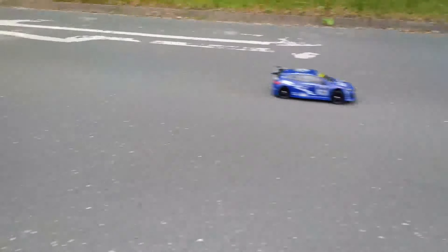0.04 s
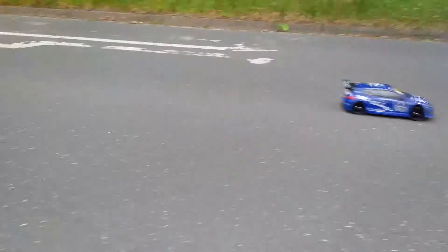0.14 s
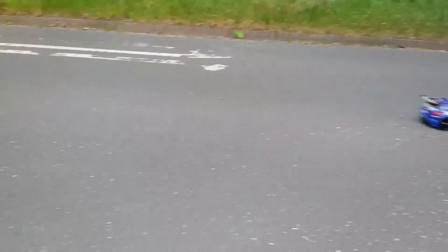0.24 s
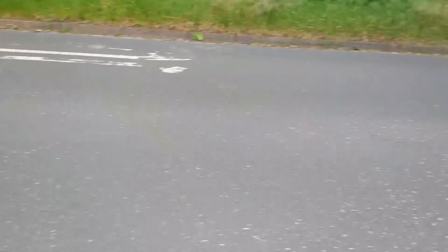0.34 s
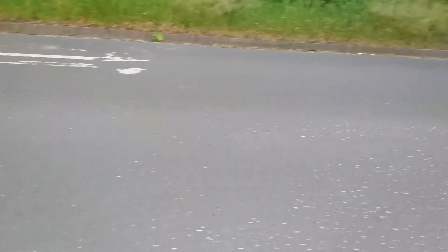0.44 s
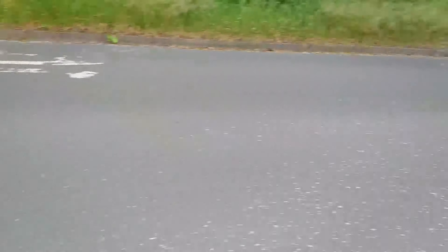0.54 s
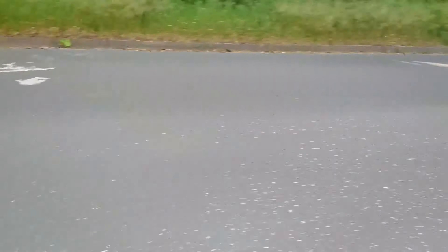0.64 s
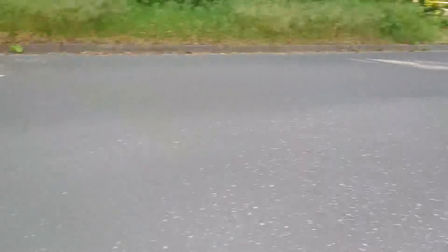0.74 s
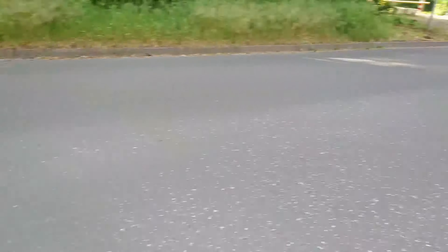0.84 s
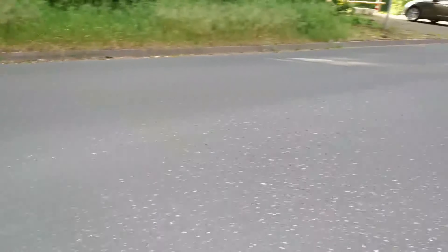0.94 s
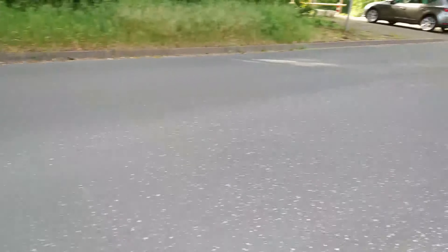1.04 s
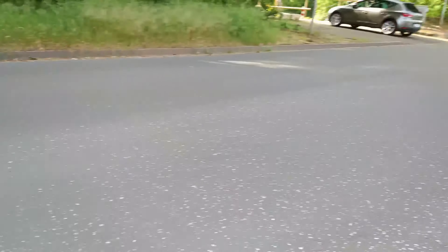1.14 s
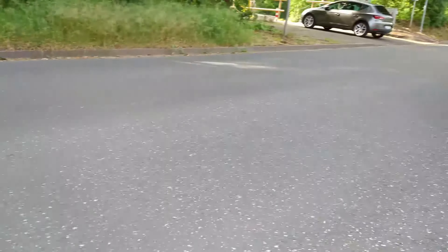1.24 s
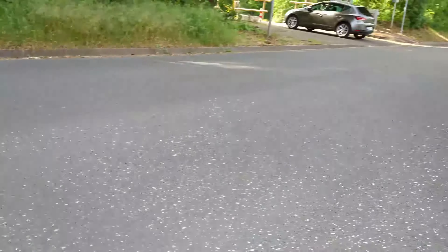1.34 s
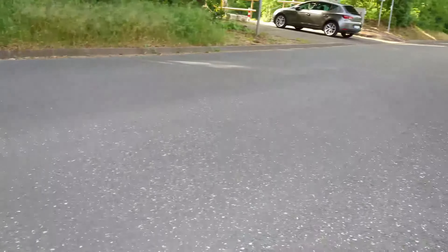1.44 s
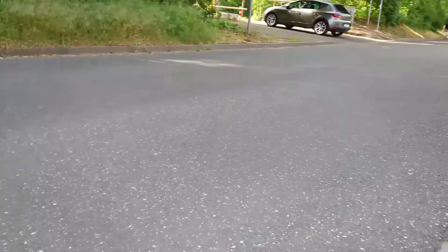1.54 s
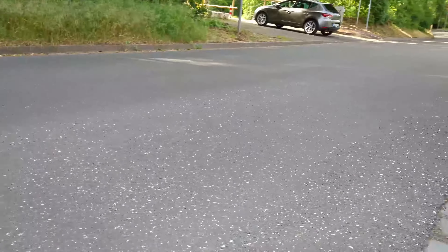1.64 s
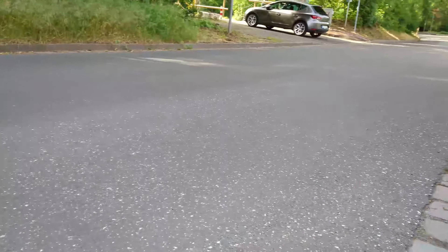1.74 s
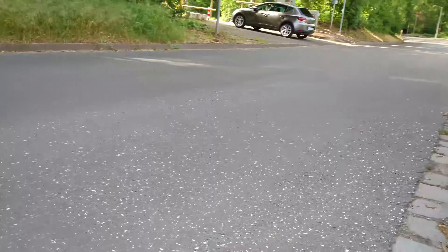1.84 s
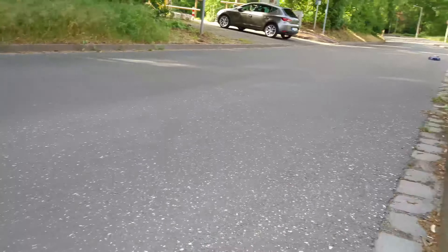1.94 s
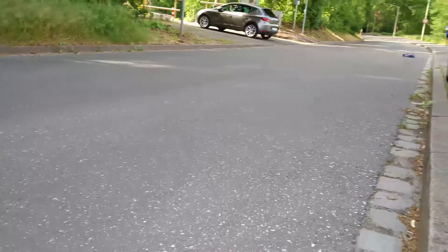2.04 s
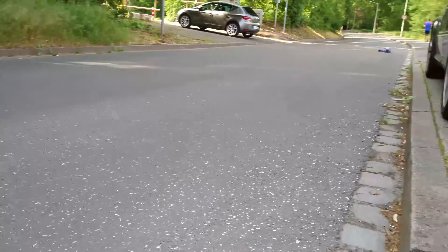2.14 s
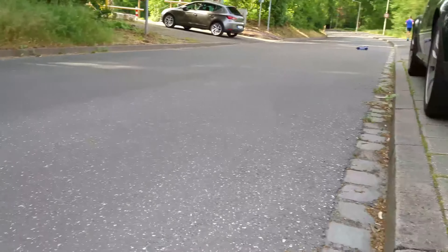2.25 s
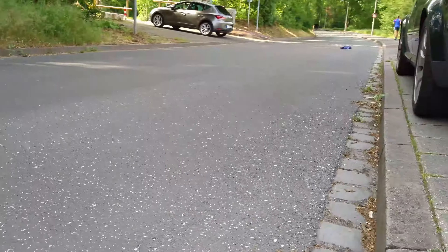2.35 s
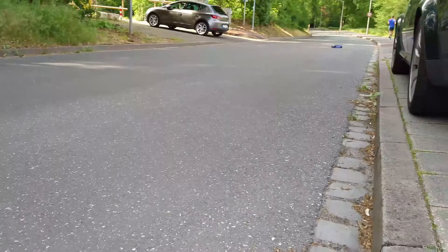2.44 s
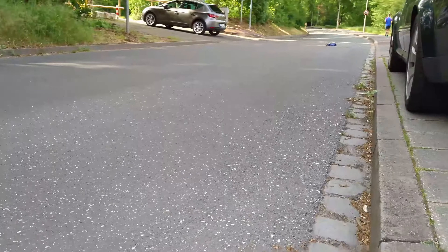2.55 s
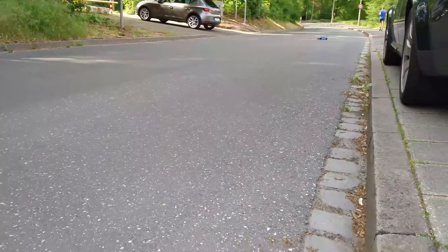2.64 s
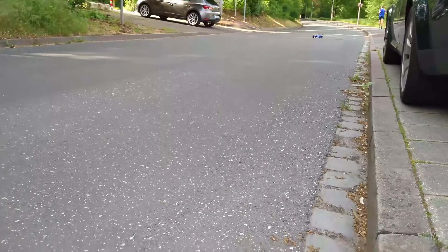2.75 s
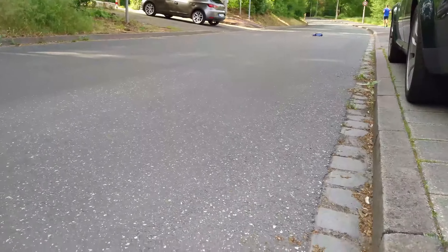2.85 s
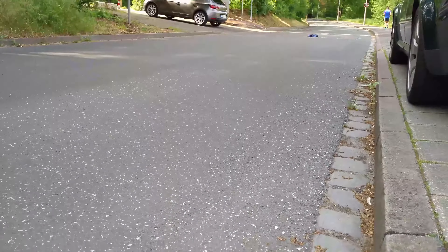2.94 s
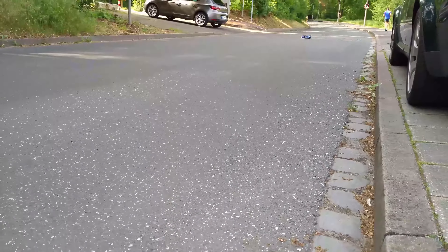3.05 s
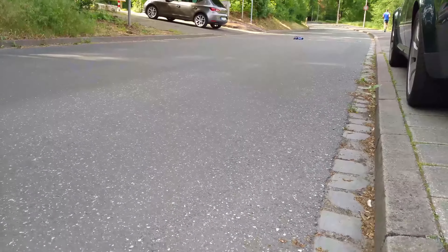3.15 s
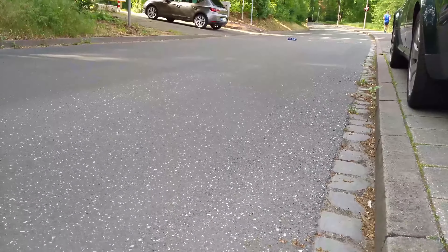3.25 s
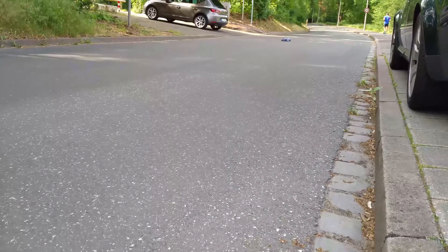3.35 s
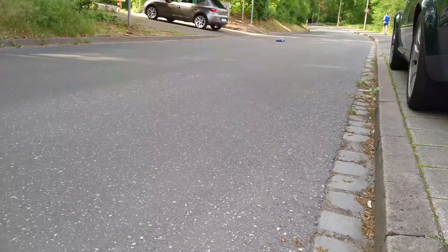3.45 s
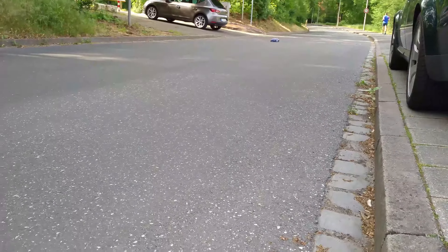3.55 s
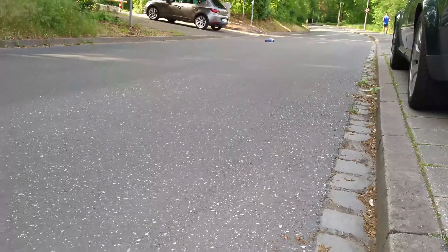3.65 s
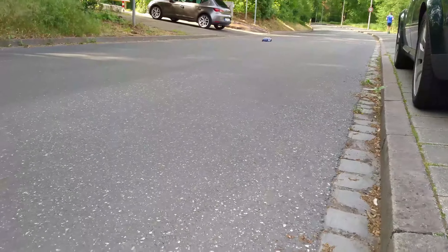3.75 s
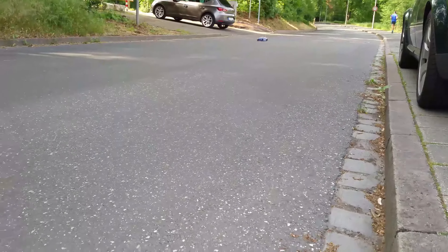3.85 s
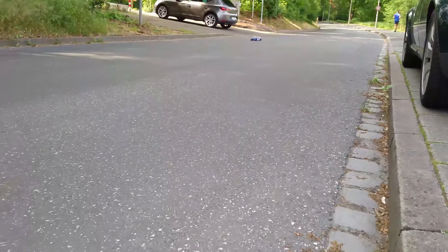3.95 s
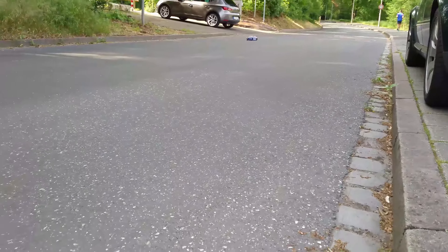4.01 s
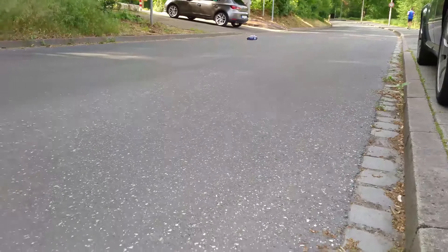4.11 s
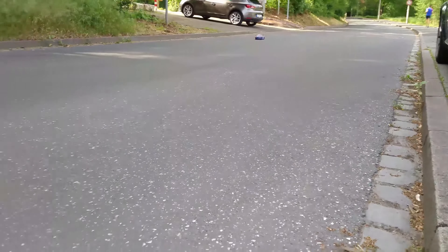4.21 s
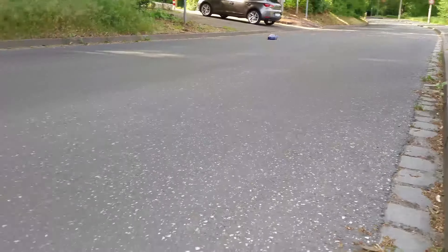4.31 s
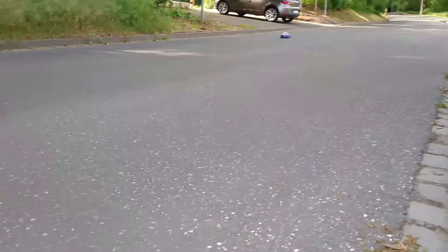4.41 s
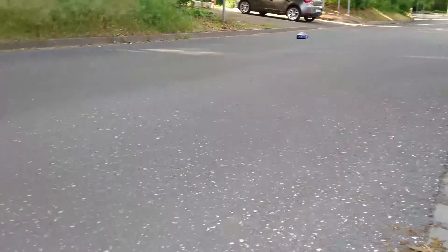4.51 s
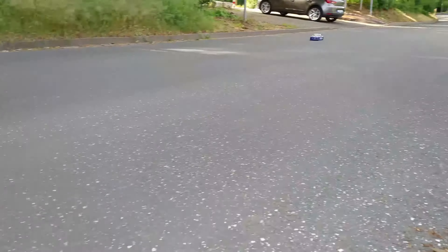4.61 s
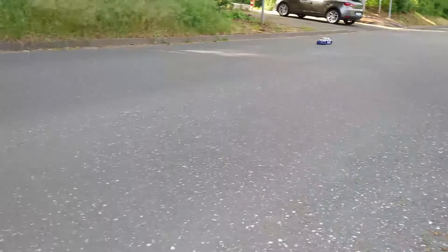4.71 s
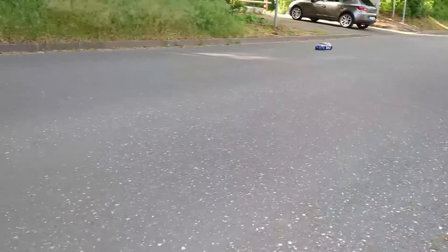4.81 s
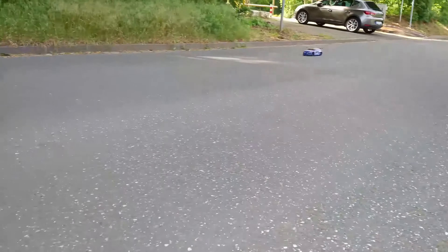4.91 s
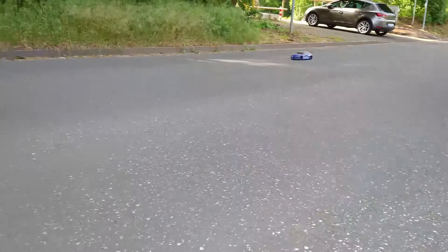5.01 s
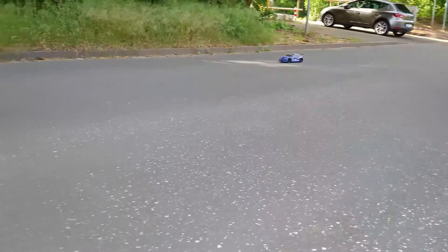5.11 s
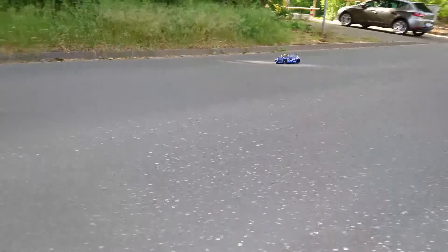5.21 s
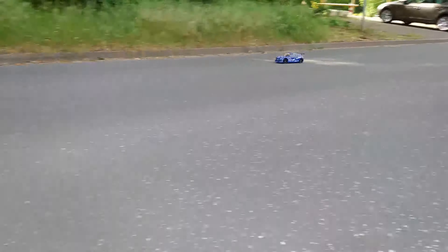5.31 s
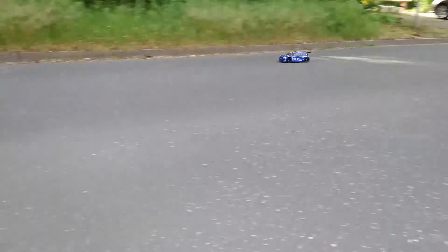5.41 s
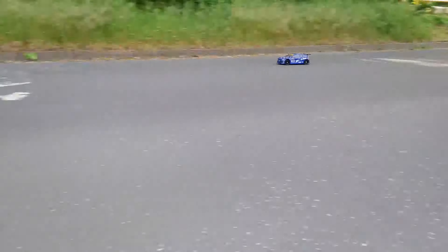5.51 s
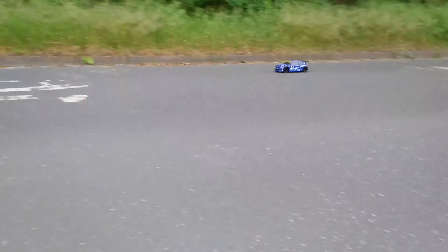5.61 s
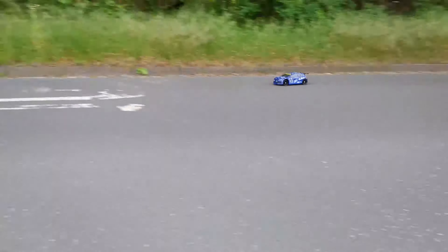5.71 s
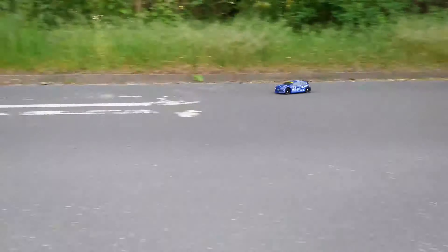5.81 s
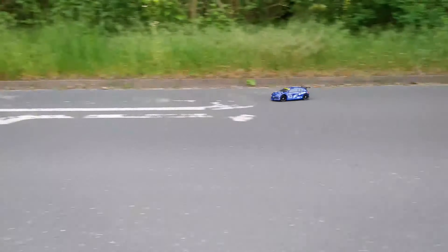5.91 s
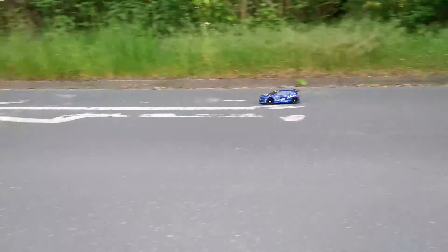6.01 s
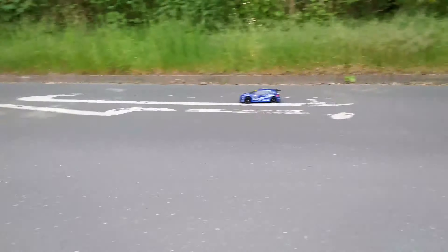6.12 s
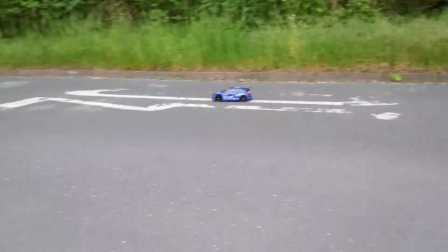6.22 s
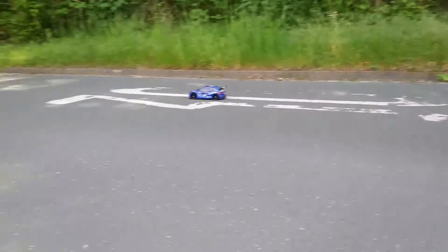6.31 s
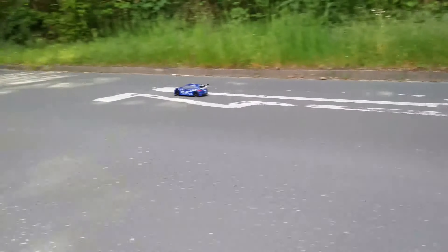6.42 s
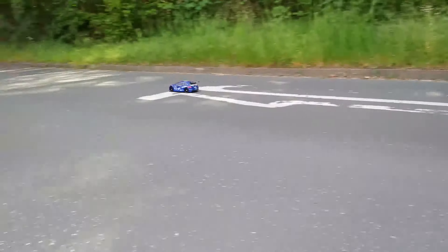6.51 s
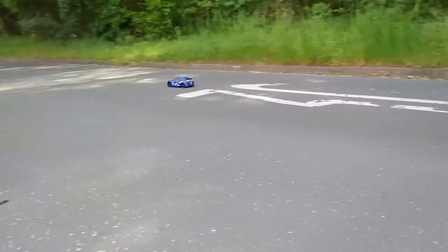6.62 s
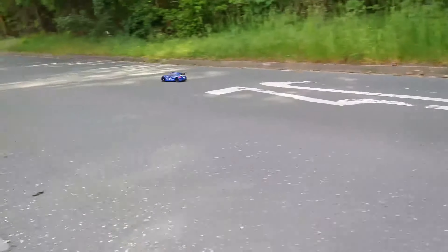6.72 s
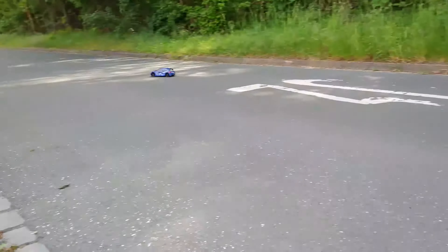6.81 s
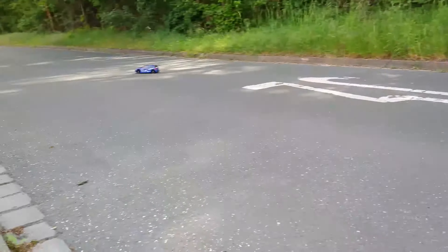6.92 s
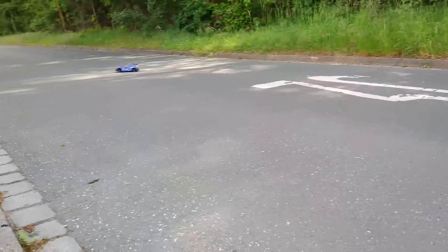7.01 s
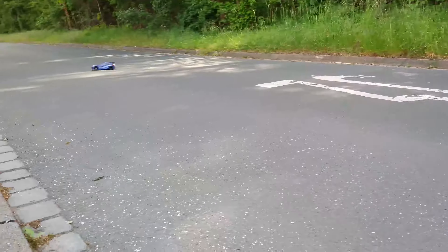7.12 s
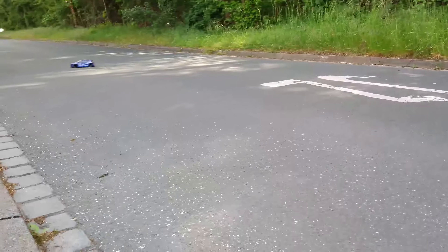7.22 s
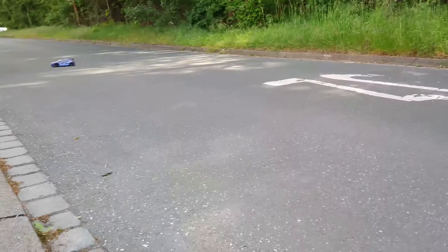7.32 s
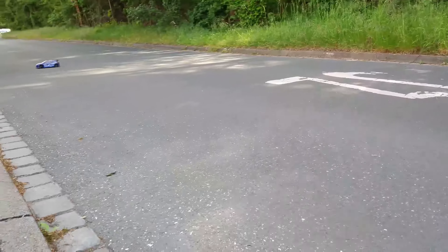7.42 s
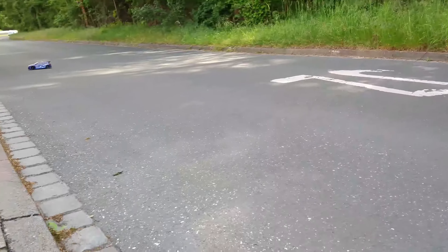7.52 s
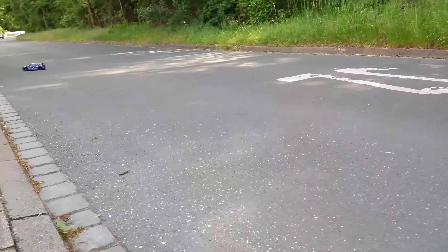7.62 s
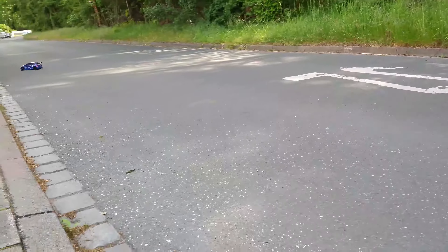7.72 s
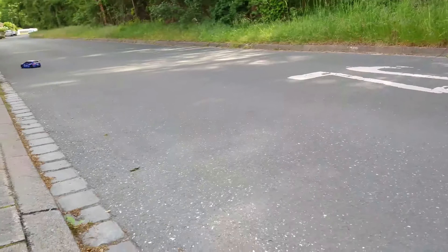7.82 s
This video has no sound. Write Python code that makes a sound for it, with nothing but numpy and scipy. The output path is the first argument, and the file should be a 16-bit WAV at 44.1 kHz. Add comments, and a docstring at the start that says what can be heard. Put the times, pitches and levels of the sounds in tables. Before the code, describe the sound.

Raspy, throbbing gear whine of a radio-controlled car sweeps by, fades, skids and knocks far off, comes back loud, then slows over faint traffic.

```python
"""On a quiet asphalt street a small electric model car races past, brakes, spins far off, returns and brakes again.
Its gear mesh whines and rasps, throbbing once a turn; the plastic shell resonates and the tyres roar.
The speed controller sings near 8 kHz, and teeth and chassis add damped rings over distant traffic.
The sound reaches two microphone ports at slightly different times; the left one rings strongly in the treble."""
import sys
import numpy as np
from scipy import signal
from scipy.fft import rfft, irfft, next_fast_len
from scipy.io import wavfile
from scipy.ndimage import uniform_filter1d, minimum_filter1d, map_coordinates

SR = 44100
rng = np.random.default_rng(int(sys.argv[2]) if len(sys.argv) > 2 else 0)


def output_pcm(signal):
    """Save a mono or channel-first signal as 16-bit PCM at the path in sys.argv[1].

    Samples are clipped to [-1, 1] before scaling.
    """
    pcm = np.clip(np.atleast_2d(signal).T, -1, 1) * 32767
    wavfile.write(sys.argv[1], SR, np.round(pcm).astype(np.int16))


N = 346626
TIME = np.arange(N) / SR


def undb(db):
    """Logarithmic level: convert decibels to an amplitude gain."""
    return 10 ** (np.asarray(db) / 20)


def curves(table):
    """Linear interpolation: join the columns of a table by straight lines in time."""
    s, *columns = np.transpose(table)
    return [np.interp(TIME, s, c) for c in columns]


def unit(x):
    """Power normalisation: scale to rms 1."""
    return x / np.sqrt(np.mean(np.abs(x) ** 2))


def colour(x, points):
    """Linear filtering: weight the spectrum by (Hz, dB) points joined on a log frequency axis."""
    size = next_fast_len(N + 4096)
    hz, db = np.transpose(points)
    bins = np.maximum(np.arange(size // 2 + 1) * SR / size, 1)
    gain = undb(np.interp(np.log(bins), np.log(hz), db))
    return irfft(rfft(x, size) * gain, size)[..., :N]


def noise(points):
    """Broadband random excitation: noise of a given spectrum, rms 1."""
    return unit(colour(rng.standard_normal(N), points))


def walk(rate):
    """Low-pass random modulation: smooth chance of rms 1, changing about rate times a second."""
    return unit(np.interp(TIME * rate, np.arange(N), rng.standard_normal(N)))


def narrowband(hz, width_hz):
    """Randomly driven resonance: a tone whose complex amplitude fluctuates at about its bandwidth."""
    envelope = walk(width_hz) + 1j * walk(width_hz)
    return np.real(envelope * np.exp(2j * np.pi * hz * TIME))


def gate(start, end, attack_s, release_s):
    """Linear envelope: rise, hold and fall between 0 and 1, half open at start and end."""
    rise = (TIME - start) / attack_s
    fall = (end - TIME) / release_s
    return np.clip(np.minimum(rise, fall) + .5, 0, 1)


def held(table, attack_s, release_s):
    """Superposition of envelopes: each event holds its values; one control per column, zero between events."""
    return sum(np.outer(values, gate(start, end, attack_s, release_s)) for start, end, *values in table)


def aspect(facing, tail, side, nose):
    """Source directivity: noise whose colour depends on which side of the car faces the listener."""
    front, back = np.clip(facing, 0, 1), np.clip(-facing, 0, 1)
    return np.sqrt(back) * noise(tail) + np.sqrt(1 - front - back) * noise(side) + np.sqrt(front) * noise(nose)


MESH_PER_TURN = 80  # tooth contacts in one turn of the spur gear


def throb(mesh_hz, depth_db=4.5, scatter_db=1.0, wobble=0.07):
    """Eccentricity modulation: an off-centre spur gear bites harder once a turn, never twice alike."""
    turns = np.cumsum(mesh_hz * (1 + wobble * walk(60))) / MESH_PER_TURN / SR
    size_db = np.interp(turns, np.arange(4096), rng.standard_normal(4096))
    return unit(undb(depth_db * np.cos(2 * np.pi * turns) + scatter_db * size_db))


# Spectrum radiated by the tonal gear mesh. Each row: frequency in Hz, gain in dB.
GEAR_RADIATION = [(900, -14), (1500, -2), (2600, 1.5), (3500, -6.5), (4600, -4), (5300, 6.5), (6500, 1.5),
                  (8000, 5.5), (10000, -3), (12000, -19), (14000, -17)]
# Spectrum of loose teeth rasping. Each row: frequency in Hz, relative level in dB.
RASP = [(2500, -12), (3800, -3.5), (4600, -4.5), (5050, 3), (5550, 5), (6000, 8.5), (6400, 8.5),
        (6850, 8.5), (7500, 4), (8500, -2), (9500, -11), (12000, -17.5)]


def gears(mesh_hz, tone, bite, wander_hz=80, rattle=0.61, octave_db=-5, tone_db=-14.0, rasp_db=-14.0):
    """Periodic tooth impact: meshing gives a rough tone and octave; loose teeth rasp and blur the pitch."""
    tone = np.clip(tone, 0, 1)
    # only fast, firm meshing holds its pitch; slow teeth chatter in their play
    firmness = tone * (mesh_hz / 6500) ** 2
    slack = np.maximum(1.3 - firmness, .3) * np.sqrt(6500 / mesh_hz)
    phase = 2 * np.pi * np.cumsum(mesh_hz + wander_hz * slack * walk(250)) / SR
    first, second = (unit(1 + rattle * (walk(700) + 1j * walk(700))) for _ in range(2))
    fundamental = first * np.exp(1j * phase)
    octave = undb(octave_db) * second * np.exp(2j * phase)
    whine = unit(np.real(fundamental + octave))
    whine = colour(whine, GEAR_RADIATION) * bite * undb(tone_db)
    rasp_swell = unit(bite ** 0.66 * undb(1.3 * walk(600)))
    rasp = noise(RASP) * rasp_swell * undb(rasp_db)
    # tone is a share of power, hence the square roots
    return np.sqrt(tone) * whine + np.sqrt(1 - tone) * rasp


def drone(mesh_hz, tone, hz=2660, width_hz=150, capture_hz=120, db=-14.0):
    """Forced resonance: under firm meshing a panel drones as half the mesh rate crosses its mode."""
    ring = narrowband(hz, width_hz)
    capture = np.exp(-((mesh_hz / 2 - hz) / capture_hz) ** 2 / 2)
    return undb(db) * np.sqrt(np.clip(tone, 0, 1)) * ring * capture


# Modes of the shell's panels. Each row: frequency in Hz, width in Hz, level in dB relative to
# the shell buzz, facing at which the panel points at the listener (-1 tail-on, 0 side-on, 1 nose-on).
PANELS = [(446.5, 130, -9, .12), (1216, 150, -4, 0.019), (1396, 350, -3, -0.95), (1443, 280, -2.5, 0.5),
          (2198, 150, -9.5, -0.19), (2330, 280, 0, -0.48), (2456, 300, -3, 1), (3325, 650, -9, -0.013),
          (4980, 320, -5, 0.2), (6100, 150, -.5, -1.2), (6770, 200, -11, -0.97)]
PANEL_BEAM = .17  # spread of facing over which a panel is heard


def panels(facing, shell_db, swell_db=3.0):
    """Modal radiation: randomly shaken shell modes swell as their panel turns to the listener."""
    out = np.zeros(N)
    for hz, width_hz, db, aim in PANELS:
        beam = np.exp(-((facing - aim) / PANEL_BEAM) ** 2 / 2)
        out += undb(db + swell_db * walk(8)) * narrowband(hz, width_hz) * beam
    return out * undb(shell_db)


# Spectra of tyre roar heard from behind, beside and ahead. Each row: frequency in Hz, relative level in dB.
ROAR_TAIL = [(35, -22), (70, 8.5), (150, 5), (340, 3), (450, 2.5), (600, -0.5), (790, 6.5), (980, -7),
             (1250, -1), (1480, 1.5), (1700, 4), (2200, -3.5), (4000, -21)]
ROAR_SIDE = [(35, -24), (70, 5), (150, 2), (220, 4), (340, -2), (450, 5), (580, -5), (930, -1.5), (1220, 2),
             (1380, 1), (1500, -2), (1650, -4.5), (2200, -7), (4000, -20.5)]
ROAR_NOSE = [(35, -24), (70, 0.5), (150, 3.5), (340, -2), (490, 1.5), (620, -4), (790, 3), (980, -11.5),
             (1250, -4), (1480, -4), (1650, -4), (2200, -1.5), (4000, -33)]
# Spectra of shell buzz from the same three sides. Each row: frequency in Hz, relative level in dB.
SHELL_TAIL = [(1300, -21), (1750, -17), (2050, 5.5), (2300, 3.5), (2650, -0.5), (2900, -3), (3600, -4.5),
              (4300, -3.5), (6000, -41), (9000, -37)]
SHELL_SIDE = [(1300, -14), (1800, 2), (2180, 6), (2380, 1), (2600, 5.5), (2900, -1), (3200, -5), (3600, -6),
              (4300, -6.5), (6000, -3.5), (9000, -20)]
SHELL_NOSE = [(1300, -40), (1800, -9), (2050, -1), (2330, 5), (2480, 0), (2660, 4), (2950, -10),
              (3700, -12.5), (4300, -8.5), (6000, -3), (9000, -64)]
# Spectrum of hissing grit. Each row: frequency in Hz, relative level in dB.
GRIT = [(2500, -2.5), (4500, 17), (7000, 6), (9000, 9), (11000, 8), (12500, 6.5), (14000, -2), (15700, 0)]


def rolling(facing, bite, roar_db, shell_db, grit_db):
    """Rough-surface excitation: tyres roar on the asphalt, the gears shake the shell and grit hisses."""
    roar = aspect(facing, ROAR_TAIL, ROAR_SIDE, ROAR_NOSE)
    shell = aspect(facing, SHELL_TAIL, SHELL_SIDE, SHELL_NOSE) * unit(bite ** 1.15)
    grit = noise(GRIT) * unit(undb(4.7 * walk(900)))
    bumps = unit(undb(1.8 * walk(90)))
    return roar * undb(roar_db) + bumps * (shell * undb(shell_db) + grit * undb(grit_db))


# The speed controller sings on part throttle. Each row: start in seconds, end in seconds,
# first frequency in Hz, last frequency in Hz, relative level in dB.
CONTROLLER = [(-.1, .2, 8180, 8150, -33), (.33, 1.097, 7895, 7850, -38.5),
              (2.505, 3.646, 8005, 8075, -47.5), (3.703, 4.451, 8247, 8230, -55),
              (4.5, 5.34, 8110, 8090, -43.5), (6.35, 6.688, 7955, 7880, -41)]
CONTROLLER_FADE_S = 0.17


def controller(mesh_hz, flutter_db=0.5, gain_db=-7.5, sideband_db=-10, motor_share=0.073):
    """Switching tone: chopped motor current sings at a gliding pitch; the rotor adds a line just above."""
    glide = []
    level = np.zeros(N)
    for start, end, first_hz, last_hz, db in CONTROLLER:
        glide += [(start, first_hz), (end, last_hz)]
        level += undb(db) * gate(start, end, CONTROLLER_FADE_S, CONTROLLER_FADE_S)
    hz, = curves(glide)
    chop = 2 * np.pi * np.cumsum(hz + 14 * walk(80)) / SR
    rotor = 2 * np.pi * np.cumsum(mesh_hz * motor_share) / SR
    tone = unit(np.sin(chop) + undb(sideband_db) * np.sin(chop + rotor))
    return tone * level * undb(gain_db + flutter_db * walk(30.1))


def scrub():
    """Sliding friction: tyres scrape sideways in the spin, lift for a moment and scrape again."""
    # Each row: time in seconds, level in dB.
    slide = [(2.22, -80), (2.25, -39.5), (2.29, -38), (2.35, -43), (2.375, -68), (2.405, -59),
             (2.417, -41), (2.46, -41), (2.53, -46), (2.65, -60)]
    # Each row: frequency in Hz, relative level in dB.
    spectrum = [(60, -13), (150, 6), (380, 5), (700, -2), (1000, -10.5), (1600, -2.5),
                (2400, -13), (4000, -14), (9000, -20), (15000, -28)]
    sliding = (TIME > slide[0][0]) & (TIME < slide[-1][0])
    return noise(spectrum) * undb(curves(slide)[0]) * sliding


# Chirps of a sliding tyre. Each row: start in seconds, end in seconds, frequency in Hz, level in dB.
CHIRPS = [(4.15, 4.219, 900, -51), (7.211, 7.49, 1010, -50.5)]


def chirps(width_hz=85, fade_s=.04):
    """Stick-slip friction: rubber sticks and slips in a rough, narrow tone."""
    out = np.zeros(N)
    for start, end, hz, db in CHIRPS:
        out += undb(db) * narrowband(hz, width_hz) * gate(start, end, fade_s, fade_s)
    return out


# Gear teeth slam over bumps. Each row: time in seconds, relative peak level in dB, ring frequency in Hz.
CLACKS = [(2.9836, -22, 5400), (3.8906, -17, 5380), (5.3495, -13, 6500), (5.8089, -14.5, 6446),
          (5.8351, -10, 6460), (5.8745, -9.5, 6550), (5.8985, -13, 6326), (5.913, -9.5, 6420),
          (6.0484, -14, 6570), (6.109, -14, 6380), (6.3183, -19, 6860), (7.1485, -20, 6020),
          (7.2574, -18, 5950), (7.2968, -15.5, 5883), (7.637, -20.5, 6144)]
# Chassis knocks in the spin, over bumps and under braking. Each row: time in seconds,
# relative peak level in dB, ring frequency in Hz, 60 dB decay time in seconds.
KNOCKS = [(2.246, -35, 324, 0.075), (2.279, -46, 416, 0.06), (2.285, -28, 820, 0.028),
          (2.332, -34, 365, 0.16), (2.348, -29, 356, 0.086), (2.415, -22.5, 1549, 0.023),
          (2.45, -31.5, 1702, 0.069), (3.308, -36.5, 940, 0.034), (3.74, -42.5, 161, 0.57),
          (7.395, -29.5, 997, 0.083)]


def blows(clack_s=0.0022, clack_db=-9, knock_db=-1, crack=0.33):
    """Impulse response: short swells of tooth ring, and damped chassis knocks with a noisy crack."""
    out = np.zeros(N)
    t = np.arange(SR // 5) / SR
    for s, db, hz in CLACKS:
        swell = (t / clack_s) ** 2 * np.exp(2 * (1 - t / clack_s))
        clack = undb(db + clack_db) * swell * np.sin(2 * np.pi * hz * t)
        out[int(s * SR):][:len(t)] += clack[:N - int(s * SR)]
    for s, db, hz, t60 in KNOCKS:
        band = signal.butter(1, [hz / 2, hz * 2], "band", fs=SR, output="sos")
        body = signal.sosfilt(band, rng.standard_normal(len(t)))
        ring = (1 - crack) * np.sin(2 * np.pi * hz * t) + crack * unit(body)
        out[int(s * SR):][:len(t)] += undb(db + knock_db) * ring * np.exp(-np.log(1000) * t / t60)
    return out


def scatter(x, t60=0.07, bass_db=-12, size=4096):
    """Diffuse reflection: kerb, hedge and parked cars return ever new echoes, different at each port."""
    t = np.arange(SR // 4) / SR
    padded = np.pad(x, size)
    out = np.zeros((2, len(padded) + len(t)))
    # overlapping stretches, each with freshly drawn echoes
    for start in range(0, N + size, size // 2):
        envelope = np.minimum(t / 0.085, 1) * np.exp(-np.log(1000) * t / t60)
        echoes = rng.standard_normal((2, len(t))) * envelope
        echoes /= np.sqrt(np.sum(echoes ** 2, axis=1, keepdims=True))
        stretch = padded[start:start + size] * signal.windows.cosine(size)
        out[:, start:start + size + len(t) - 1] += signal.fftconvolve(stretch[None], echoes, axes=1)
    spectrum = [(250, bass_db), (600, -2.5), (1200, 3.5), (3000, 9.0), (6500, -2.5), (10000, 11.5)]
    return colour(out[:, size:size + N], spectrum)


# Spectrum of distant traffic. Each row: frequency in Hz, relative level in dB.
STREET = [(20, -10), (38, -6), (60, 6.5), (78, -3), (100, 5.5), (160, -0.5), (230, -3), (450, -8),
          (1000, -61), (3000, -11), (15000, -52)]


def street(level_db=-53.0, side_db=-15, hum_hz=79):
    """Interaural coherence: traffic nearly alike at both ports but for the lowest rumble, with an engine hum."""
    apart = colour(noise(STREET), [(25, 9), (70, -1), (200, 1)]) * np.array([[1], [-1]])
    swell = undb(1.2 * walk(2))
    air = noise(STREET) * swell + undb(side_db) * apart
    # The hum swells, fades and slowly returns. Each row: time in seconds, level in dB.
    hum_db, = curves([(0, -62), (.5, -54), (1.2, -48), (1.6, -79), (7.86, -55)])
    hum = unit(np.sin(2 * np.pi * np.cumsum(hum_hz + 2.9 * walk(8)) / SR))
    return undb(level_db) * air + undb(hum_db) * hum


NEAR_M, CRUISE_HZ = 2.5, 6500  # reference distance and mesh rate


def loudness(law, metres, mesh_hz, facing):
    """Distance and speed laws: level in dB falls with distance, grows with speed, varies nose to tail."""
    near_db, distance_db, speed_db, nose_db = law
    spreading_db = distance_db * np.log2(metres / NEAR_M)
    return near_db + spreading_db + speed_db * np.log2(mesh_hz / CRUISE_HZ) + nose_db * facing


# Speed of the drive train. Each row: time in seconds, gear mesh rate in Hz.
SPEED = [(0, 5340), (.27, 6446), (.52, 7114), (.9, 7820), (1.25, 6040), (1.6, 5820), (2.36, 1474),
         (2.6, 1804), (2.95, 2602), (3.12, 3224), (3.3, 3370), (3.52, 3945), (3.87, 5370), (4.3, 5157),
         (4.72, 6000), (5.3, 6414), (6, 6445), (6.66, 6820), (7.45, 1810), (7.86, 1320)]
# Path of the car. Each row: time in seconds, distance in metres, delay of the left port behind
# the right in ms, facing (-1 tail-on, 0 side-on, 1 nose-on).
PATH = [(0, 1.84, -0.062, -0.073), (.15, 2.14, -0.013, 0.05), (.4, 2.56, 0.24, -0.43),
        (.7, 4.24, .24, -0.75), (1.1, 6.8, 0.23, -0.89), (1.6, 10.2, .23, -1.1), (2.3, 12.3, 0.15, -1.15),
        (3, 15.4, .12, 0.53), (3.5, 13.4, 0.049, 1), (4.1, 10.3, 0.043, 0.8), (4.7, 7.05, 0.086, 0.96),
        (5.5, 4.75, 0.058, 0.31), (5.9, 3.36, 0.037, 0.044), (6.4, 4.43, -0.018, -0.15),
        (7, 4.88, -0.15, 0.0061), (7.6, 4.32, -.21, -0.2), (7.86, 10, -.26, -0.09)]
# Throttle or brake loads the gears, a lift slackens them. Each row: start in seconds, end in seconds,
# gear gain in dB, shell gain in dB, share of the gear sound that is tone from 0 to 1.
LOADS = [(-.1, .07, 9.5, 4.5, 0.21), (.07, .22, 7, 3, 0.14), (.22, .42, 10.5, 3.5, 0.81),
         (.42, .53, 5.5, 4.5, 0.7), (.53, .9, 2, 5, .1), (1.19, 1.5, 2, 2, 0.04), (2.25, 2.34, 8.5, 0, 0),
         (2.42, 2.75, 9.5, -4, 0.68), (2.75, 2.92, 7, -4, 0.45), (2.92, 3.03, 9, -6, 0.75),
         (3.03, 3.14, 8, -7, 0.84), (3.27, 3.52, 3.5, 0, 0.7), (3.72, 3.95, 8, 5, 0.29),
         (3.97, 4.16, -0.5, -2.5, 0.06), (4.19, 4.56, 1.5, 5, .28), (4.56, 4.92, 4, 1.5, .42),
         (5.16, 5.49, 6.5, 2, 0.74), (5.49, 5.69, 4.5, 1.5, 0.24), (5.69, 5.95, 6, 1, 0.91),
         (5.99, 6.13, 6.5, 1.5, 0.71), (6.13, 6.67, 4.5, 3, .4), (6.67, 7.08, -1, -0.5, 0.07),
         (7.11, 7.38, 5, 2, 0.1), (7.57, 7.68, 2.5, 3, 0)]
LOAD_ATTACK_S, LOAD_RELEASE_S = 0.0538, 0.0583
COASTING_TONE = 0.033  # least share of tone, as in unloaded gears; the rest is rasp
# Tyres slip on the asphalt. Each row: start in seconds, end in seconds, roar gain in dB, grit gain in dB.
SKIDS = [(1.92, 2.32, 7, 12.5), (2.41, 2.72, 6.5, -5), (4.05, 4.27, 3.5, 8.5), (6.82, 7.45, 3.5, 4.5)]
SKID_ATTACK_S, SKID_RELEASE_S = 0.24, 0.22
# Loudness laws. Each row: relative level in dB at NEAR_M and CRUISE_HZ, dB per doubling of distance,
# dB per doubling of speed, extra dB nose-on.
GEAR_LAW = (-23, -6, 3, 0)
ROAR_LAW = (-39, -4.5, 3.6, -2)
SHELL_LAW = (-41, -5, 2.5, 1.5)
GRIT_LAW = (-38, -9, 5, 0.5)
PANEL_LOAD = 1.23  # panels gain this many dB for each dB of load on the shell
PANEL_THROB = 1.45  # panels throb this many times deeper than the gears, in dB
ECHO_DB, ECHO_DB_PER_DOUBLING = -6, 0.09  # echo gain at NEAR_M, and its growth per doubling of distance


def scene():
    """Superposition and propagation: parts add up by speed, distance, load and slip, then reach two ports."""
    mesh_hz, = curves(SPEED)
    metres, lag_ms, facing = curves(PATH)
    gear_load_db, shell_load_db, tone = held(LOADS, LOAD_ATTACK_S, LOAD_RELEASE_S)
    roar_skid_db, grit_skid_db = held(SKIDS, SKID_ATTACK_S, SKID_RELEASE_S)
    laws = (GEAR_LAW, ROAR_LAW, SHELL_LAW, GRIT_LAW)
    gear_db, roar_db, shell_db, grit_db = (loudness(law, metres, mesh_hz, facing) for law in laws)

    bite = throb(mesh_hz)
    drive = gears(mesh_hz, np.maximum(tone, COASTING_TONE), bite) * undb(gear_db + gear_load_db)
    body = rolling(facing, bite, roar_db + roar_skid_db, shell_db + shell_load_db, grit_db + grit_skid_db)
    rings = panels(facing, shell_db + PANEL_LOAD * shell_load_db)
    rings += drone(mesh_hz, tone) * undb(gear_db + gear_load_db + shell_load_db)
    car = drive + body + rings * unit(bite ** PANEL_THROB)
    car += controller(mesh_hz) + scrub() + chirps() + blows()

    lag = lag_ms * SR / 1000  # in samples, split evenly between the ports
    direct = np.array([map_coordinates(car, [np.arange(N) - side * lag / 2], order=3) for side in (1, -1)])
    echo_db = ECHO_DB + ECHO_DB_PER_DOUBLING * np.log2(metres / NEAR_M)
    return direct + scatter(car * undb(echo_db)) + street()


# Responses of the two ports. Each row: frequency in Hz, gain in dB.
LEFT_PORT = [(100, -4.5), (3800, 1.5), (4600, 8), (5400, 9), (6000, 12.5), (6600, 15), (7300, 13.5),
             (8100, 6.5), (9000, 7), (10000, -1.5), (14000, -2.5)]
RIGHT_PORT = [(100, -4), (3800, 1.5), (4800, 0.5), (5600, -0.5), (6500, -7), (7400, -1.5), (8300, 1.5),
              (10000, -2), (14000, -1)]
TOP_HZ = 15800  # upper band edge


def record(dry):
    """Transducer response: each port adds its colour, a fast limiter holds peaks and the top is cut."""
    ports = np.array([colour(dry[0], LEFT_PORT), colour(dry[1], RIGHT_PORT)])
    room = .92 / np.maximum(np.abs(ports), .92)  # gain that keeps each sample within 0.92
    ports = ports * uniform_filter1d(minimum_filter1d(room, size=128), size=128)
    return signal.sosfilt(signal.ellip(10, .1, 80, TOP_HZ, fs=SR, output="sos"), ports)


dry = scene()
out = record(dry)
output_pcm(out)
```